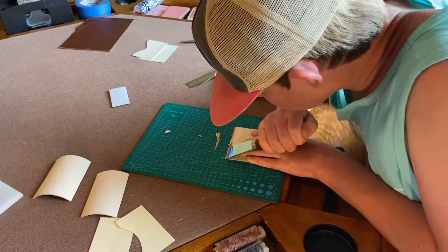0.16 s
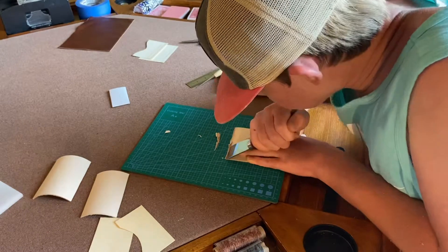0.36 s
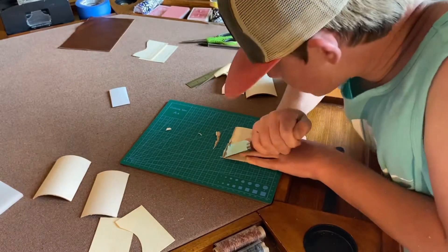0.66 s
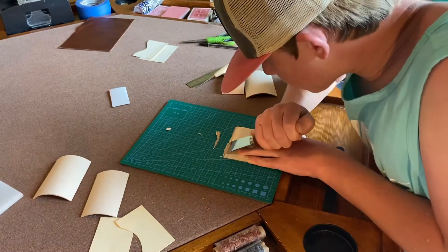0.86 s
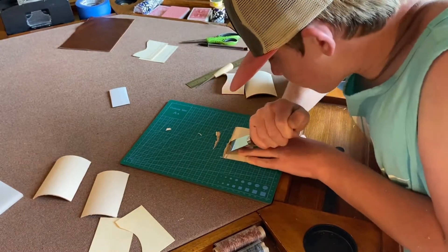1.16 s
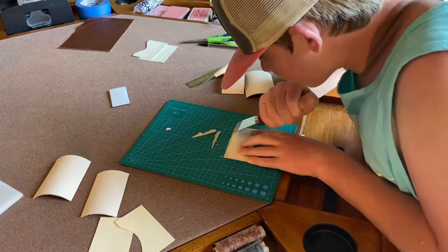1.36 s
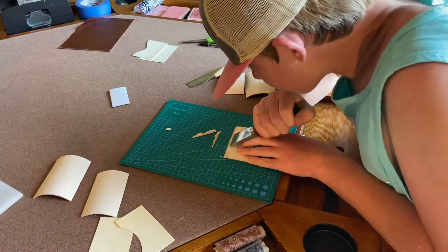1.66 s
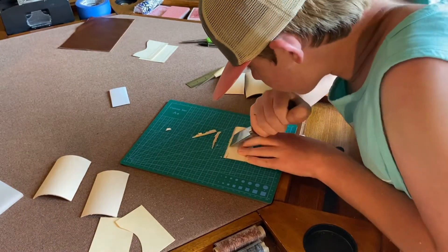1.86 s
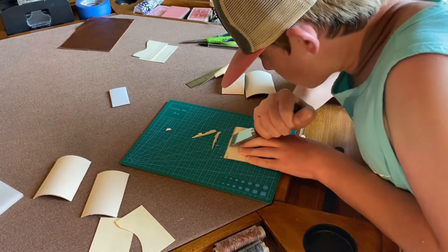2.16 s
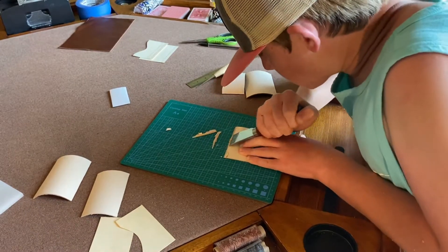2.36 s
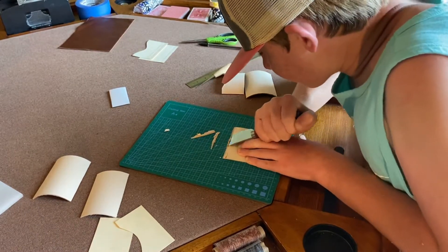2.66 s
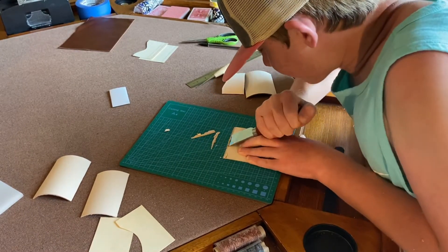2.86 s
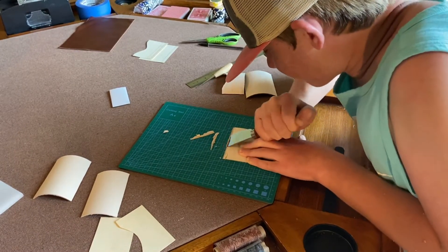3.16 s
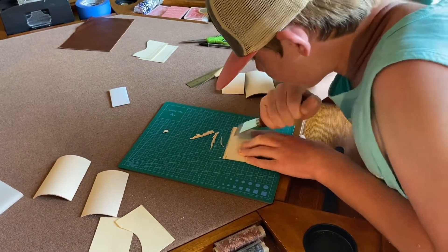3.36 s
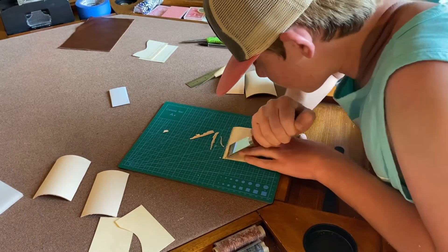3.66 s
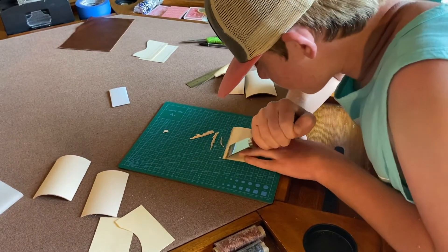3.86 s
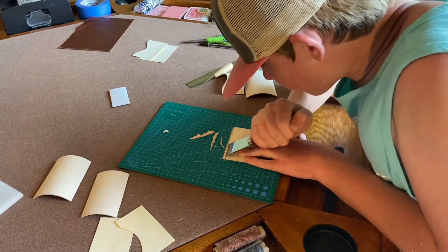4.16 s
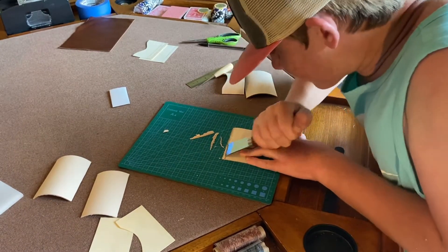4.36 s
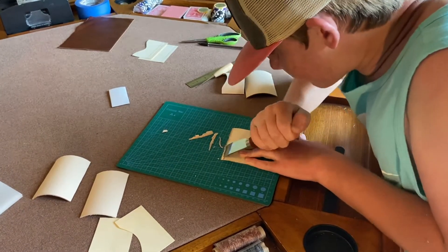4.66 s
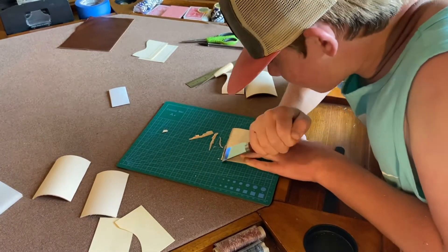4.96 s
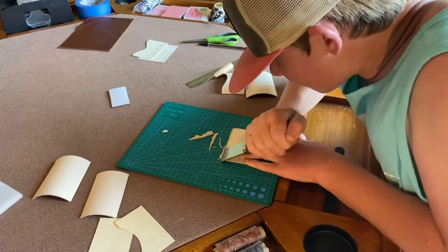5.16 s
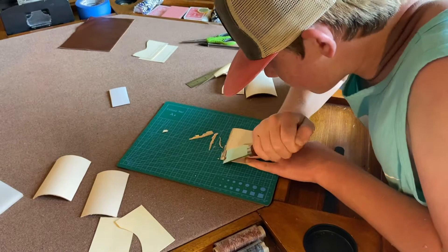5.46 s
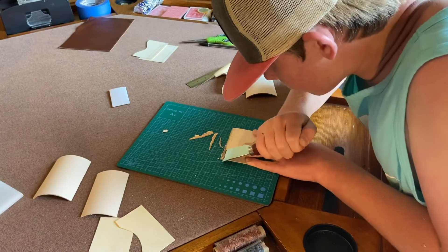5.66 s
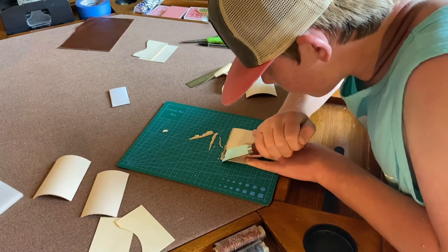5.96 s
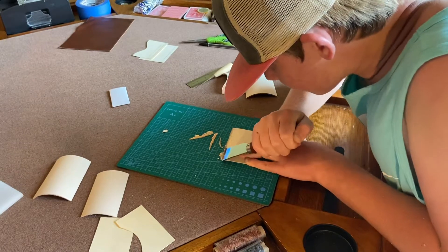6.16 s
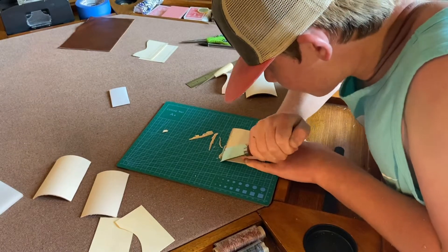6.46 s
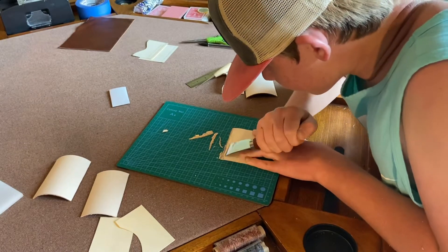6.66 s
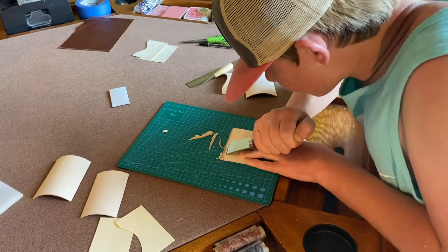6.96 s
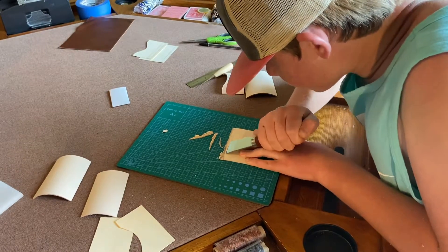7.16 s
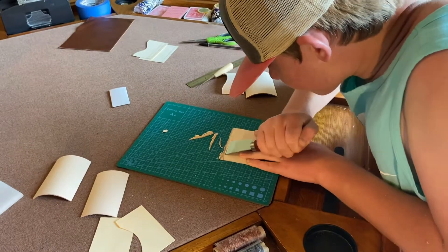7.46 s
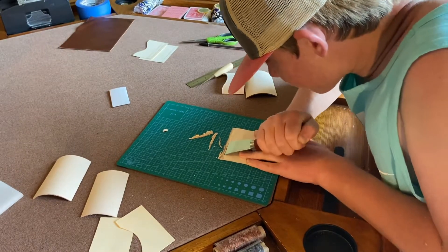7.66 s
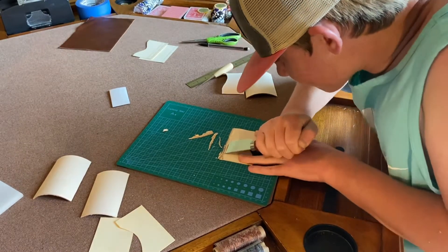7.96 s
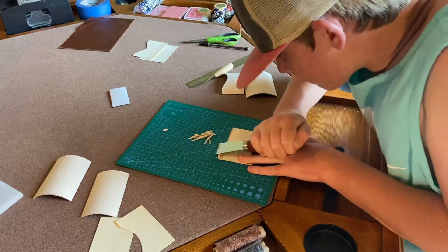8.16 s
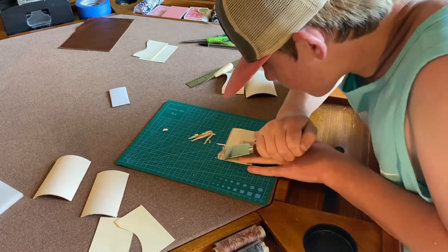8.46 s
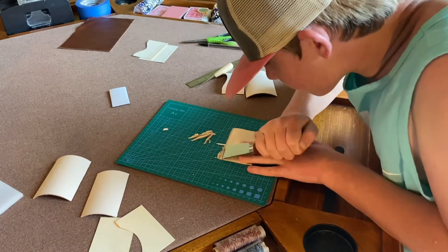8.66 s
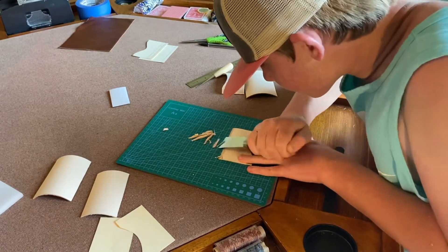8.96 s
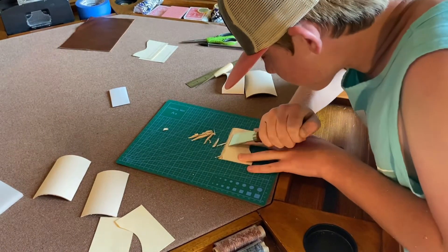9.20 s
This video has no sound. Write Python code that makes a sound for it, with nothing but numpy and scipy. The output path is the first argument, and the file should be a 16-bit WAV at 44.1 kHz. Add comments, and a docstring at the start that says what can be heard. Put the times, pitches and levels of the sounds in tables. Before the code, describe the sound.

A hand blade scrapes and squeaks through leather in short pushes, with a few knocks and one sharp snap, over a steady fan hum.

```python
"""A hand blade pares thin strips off the edge of a piece of leather on a cutting mat.
It is set down with a scuff and a knock that rings the bench, then pushed: it sticks and slips about
sixteen times a second, tearing fibres and squeaking. Once it breaks through and snaps down hard on its
steel edge. Fingers brush the grain, single fibres tick, and a fan hums under it all in the small room."""
import sys
import numpy as np
from scipy import signal
from scipy.fft import rfft, irfft, next_fast_len
from scipy.io import wavfile
from scipy.ndimage import uniform_filter1d

SR = 44100
rng = np.random.default_rng(int(sys.argv[2]) if len(sys.argv) > 2 else 0)


def wav_record(signal):
    """Record a signal, one row per channel, as 16-bit PCM in the file named by sys.argv[1]."""
    frames = np.transpose(np.atleast_2d(signal))
    bounded = np.clip(frames, -1, 1)
    # unit amplitude maps onto the largest positive 16-bit level
    quanta = np.round(bounded * 32767).astype(np.int16)
    wavfile.write(sys.argv[1], SR, quanta)


N = 411453
TIME = np.arange(N) / SR
SIZE = next_fast_len(N + SR // 2, True)
FREQS = np.arange(SIZE // 2 + 1) * SR / SIZE

# Rush of the fan. Each row: frequency in Hz, level in dB. All table levels are relative, before the mix.
AIR_COLOUR = [(20, -40), (40, -38.5), (70, -24), (110, -13), (160, -3.5), (280, -8), (400, -2.5), (620, -9),
              (800, -12), (1600, -17.5), (2600, -20), (4000, -30), (8000, -34), (10500, -41),
              (12500, -44.5), (15500, -47)]
# Droning resonances of the fan. Each row: frequency in Hz, width in Hz, level in dB.
FAN_DRONES = [(55, 5.6, -22.5), (95, 16, -8), (160.4, 44, -3), (172, 13, -0.5), (215.4, 34.5, 2),
              (351, 28, 1), (449, 41, 1), (612, 130, -6.5), (1150, 250, -18.5)]
# Stereo image of the fan. Each row: frequency in Hz, likeness of the channels from 0 to 1.
FAN_LIKENESS = [(40, 0.44), (120, 1), (300, 0.8), (700, 0.93), (1500, 0), (3000, 0), (8000, 0.1),
                (15000, 0.7)]
# Pan of the fan. Each row: frequency in Hz, left minus right in dB.
FAN_PAN = [(60, 10), (120, -1.5), (240, 2), (480, 7), (950, 1), (1890, 5), (3770, 2), (7520, 2.5),
           (15000, 7.5)]
# The edge skids as it is placed. Each row: start in seconds, level in dB, length in seconds,
# hiss offset in dB.
EDGE_SKIDS = [(0.565, -43, 0.0034, -23), (1.143, -44.5, 0.02, -11.5), (1.922, -55.5, 0.01, -32),
              (6.33, -57.5, 0.01, -19), (6.97, -60, 0.0079, -26), (7.043, -59.5, 0.0097, -31),
              (7.906, -65, 0.007, -31), (7.965, -62, 0.008, -30), (8.022, -63, 0.011, -30),
              (8.064, -47, 0.02, -15), (8.858, -50, 0.02, -12)]
# The edge touches again and rings. Each row: start in seconds, level in dB, length in seconds,
# hiss offset in dB, ring pitch in Hz, ring offset in dB.
RINGING_TOUCHES = [(1.197, -60, 0.0078, -17, 2140, 4), (8.103, -52, 0.013, -16, 2160, -2.5),
                   (8.897, -53, 0.011, -13, 3390, -9)]
# Tone of a skid. Each row: frequency in Hz, level in dB.
SKID_COLOUR = [(150, -9), (700, 18.5), (1600, 8.5), (2400, 9.5), (4200, 2.5), (5500, -1), (8300, -1.5),
               (11000, -13)]
# Blade and hand bump the bench. Each row: start in seconds, knock in dB, thump in dB, favoured frequency
# in Hz, its boost in dB, settling offset in dB, settling delay in seconds, pitch ratio of the modes.
BUMPS = [(0.5662, -27, -31, 326, 9, -6, 0.01, 0.99), (1.1513, -35, -40, 1100, 7, -1, 0.0057, 0.96),
         (1.1594, -31.5, -31, 713, 9, -4.5, 0.011, 1.02), (3.065, -40, -49, 450, 7, -4, 0.011, 1.0),
         (3.144, -35.5, -33.5, 160, -2, -2.5, 0.014, 1.01), (3.182, -48, -38.5, 139, 10, -9, 0.0091, 1.0),
         (3.241, -35, -41.5, 140, 8, 1.5, 0.01, 1.02), (5.112, -38.5, -39.5, 1220, 6, -24, 0.0072, 0.98),
         (6.345, -52, -41, 1125, 7, -21, 0.01, 1.06), (8.071, -42.5, -49, 890, 13, -10, 0.01, 1.02),
         (8.8648, -32.5, -41, 613, 6, 1.5, 0.01, 0.99)]
# Bench top under the mat. Each row: base frequency in Hz, level in dB, seconds to fall by 60 dB.
BENCH_MODES = [(118, -12, 0.11), (159, -8, 0.21), (191.5, -8, 0.14), (290, -8, 0.12), (384, -3, 0.099),
               (454.3, 4, 0.097), (540, -2.5, 0.05), (640, 1.5, 0.061), (894, -9, 0.073), (1107, -1, 0.048),
               (1356, -1, 0.02), (1550, -3.5, 0.016), (2260, 1, 0.012), (2787, -4.5, 0.026),
               (3376, -30.5, 0.03), (5370, -15.5, 0.018)]
# Fingers brush the leather. Each row: start in seconds, level in dB, length in seconds.
FINGER_STROKES = [(0.6, -73, 0.094), (3.4, -80, 0.82), (4.42, -67, 0.11), (4.7, -76, 0.59), (5.55, -79, 1),
                  (6.01, -77, 0.046), (6.6, -91, 0.5), (7.12, -81, 0.041), (8.31, -71, 0.025)]
# Short ticks, mostly single fibres parting; a few are other light touches, such as the edge scuffing at 1.017
# s. Each row: start in seconds, pop in dB, click in dB, click centre in Hz.
FIBRE_BREAKS = [(1.017, -50.5, -59, 5500), (2.396, -51, -66, 10000), (2.471, -58, -63, 10000),
                (2.541, -47, -64, 10500), (2.6, -44.5, -60, 10500), (2.660, -47, -61, 10000),
                (2.72, -47, -70, 10500), (3.038, -49, -59, 4540), (3.098, -48, -69, 10000),
                (3.209, -46, -58, 9120), (4.34, -50, -62, 9900), (4.414, -61, -62, 9500),
                (4.465, -45, -56, 8950), (4.544, -52, -55, 8900), (4.596, -47, -70, 9000),
                (4.658, -54, -55, 9000), (4.689, -46.5, -57, 5000), (4.906, -60, -56.5, 6900),
                (5.047, -54, -55, 5900), (5.111, -57, -58, 7000), (7.476, -58, -49.5, 7500),
                (8.074, -55, -47, 9500)]
# Pushes through the leather. Each row: first slip, last slip and hardest moment in seconds, peak effort
# in dB, swell in dB per second, drag offset in dB, squeak offset in dB.
BLADE_PUSHES = [(2.164, 2.446, 2.33, -46.5, 70, -8, 0.5), (2.5, 2.746, 2.68, -43.5, 48, -5, -1),
                (2.994, 3.176, 3.135, -36, 93, -6.5, -7), (4.162, 4.62, 4.58, -43, 24.5, -0.5, -2),
                (5.181, 5.303, 5.23, -49.5, 10, -5, -18)]
# Light slides between pushes. Each row: start in seconds, level in dB, length in seconds.
LIGHT_SLIDES = [(3.93, -72, 0.11), (5.33, -66, 0.12), (6.28, -65.5, 0.21), (7.85, -70, 0.28)]
# Tone of tearing fibres. Each row: frequency in Hz, level in dB.
TEAR_COLOUR = [(150, -31), (600, 0), (1100, 9), (2000, 4.5), (3100, 4), (4400, -7), (6000, -9.5),
               (7500, -10), (10000, -21.5), (12000, -19)]
# Tone of the edge rubbing along the cut. Each row: frequency in Hz, level in dB.
RUB_COLOUR = [(150, -31.5), (600, 7.5), (1100, 10.5), (2400, 0), (4200, -7.5), (7500, -12), (11000, -18)]
# Squeak of the thin edge. Each row: frequency in Hz, width in Hz, level in dB.
SQUEAK_BANDS = [(2900, 600, -9), (4200, 700, -7.5), (5650, 650, -6), (14330, 480, -12.5)]
# The blade breaks through, strikes and bounces. Each row: start in seconds, level in dB, click offset
# in dB, grind offset in dB, favoured frequency in Hz, its boost in dB.
STEEL_STRIKES = [(3.2399, -14.5, 18.5, -15, 5500, 1), (3.272, -21, 7, -12.5, 1393, 2.5),
                 (3.2773, -26, 0, -13, 5500, -1), (3.3163, -31.5, 4, -17, 3000, 5)]
# Steel blade damped by the fist. Each row: frequency in Hz, width in Hz, level in dB.
BLADE_MODES = [(1177, 19, 10), (1235, 700, 3), (1680, 145, 10.5), (2434, 150, 6.5), (2680, 75, 7.5),
               (2980, 330, 5.5), (3676, 90, 10), (3850, 350, 4), (5500, 570, 3.5), (5900, 55, 9.5),
               (6530, 600, -2), (7800, 830, -1), (9260, 3000, -18)]
# High ring of the very edge. Each row: frequency in Hz, width in Hz, level in dB.
EDGE_MODES = [(14300, 350, -18), (15450, 400, -14)]
# Stereo image of the reverb. Each row: frequency in Hz, likeness of the channels from 0 to 1.
REVERB_LIKENESS = [(150, 0.35), (700, 0.73), (1500, 0.4), (3000, 0.032), (8000, 0.033), (15000, 0.092)]
# Pan of the work on the bench. Each row: frequency in Hz, left minus right in dB.
WORK_PAN = [(200, 2), (450, 3), (900, 2.5), (1400, 6.5), (1800, 4.5), (2600, 4), (4000, 2.5), (9500, 2),
            (13500, 7)]


def from_db(db):
    """Decibels to gain."""
    return 10 ** (np.asarray(db) / 20)


def rms_one(x):
    """Scale to unit power."""
    return x / np.sqrt(np.mean(np.abs(x) ** 2) + 1e-20)


def over_hz(points):
    """Join (Hz, value) points on a log-frequency axis."""
    hz, value = np.transpose(points)
    return np.interp(np.log(FREQS + 1), np.log(hz), value)


def filtered(x, response):
    """Pass a signal through a frequency response."""
    return irfft(rfft(x, SIZE) * response, SIZE)[..., :N]


def colour(points):
    """Minimum-phase EQ curve through the points, at unit power gain."""
    cepstrum = irfft(np.log(from_db(over_hz(points))), SIZE)
    log_response = rfft(2 * cepstrum[1:SIZE // 2], SIZE) * np.exp(-2j * np.pi * FREQS / SR)
    return rms_one(np.exp(log_response))


def resonance(hz, width):
    """Response of one damped resonance, gain 1 at its peak."""
    return 1j * FREQS * width / (hz ** 2 - FREQS ** 2 + 1j * FREQS * width)


def band(hz, width):
    """Two like resonances in series, at unit power gain."""
    return rms_one(resonance(hz, width) ** 2)


def pan(points):
    """Left and right gains at each frequency."""
    return from_db(over_hz(points) * np.array([[.5], [-.5]]))


def favoured(hz, spot_hz, spot_db, octaves):
    """Extra dB for the modes that answer most at one spot of contact."""
    return spot_db * np.exp(-(np.log2(hz / spot_hz) / octaves) ** 2)


def stereo_noise(likeness):
    """White noise in two channels, as alike as the table says."""
    alike = np.clip(over_hz(likeness), 0, 1)
    mid, side = filtered(rng.standard_normal((2, N)), np.sqrt([1 + alike, 1 - alike]))
    return np.array([mid + side, mid - side]) / np.sqrt(2)


def grains(per_s, spread_db):
    """Tiny fractures at random moments, a few much larger than the rest."""
    sizes = from_db(spread_db * np.minimum(rng.exponential(1, N), 4)) * rng.choice([-1, 1], N)
    return rms_one(sizes * (rng.random(N) < per_s / SR))


def bursts(rows, texture, rise):
    """The texture swells and dies at each (start, dB, length); rise is the attack as a share of length."""
    out = np.zeros(N)
    for start, db, length in rows:
        span = slice(int(start * SR), min(N, int((start + 3 * length) * SR)))
        age = (TIME[span] - TIME[span.start]) / length
        burst = texture[span] * (1 - np.exp(-age / rise)) * np.exp(-age ** 2)
        out[span] += from_db(db) * rms_one(burst) * np.sqrt(3)
    return out


def fan(fan_db=-48.0):
    """A steady bed of rushing air with a few droning resonances."""
    drone_power = sum(np.abs(from_db(db) * resonance(hz, width) ** 2) ** 2 for hz, width, db in FAN_DRONES)
    tone = rms_one(np.sqrt(from_db(over_hz(AIR_COLOUR)) ** 2 + drone_power))
    return from_db(fan_db) * filtered(stereo_noise(FAN_LIKENESS), tone * pan(FAN_PAN))


def scuffs(scuff_db=-3.5):
    """Gritty skids of the edge with a hiss on top; on a rebound the loosely held blade rings."""
    grit = grains(per_s=7300, spread_db=3.5)
    touches = [row[:4] for row in EDGE_SKIDS + RINGING_TOUCHES]
    skids = bursts([row[:3] for row in touches], grit, rise=0.93)
    hiss_rows = [(start, db + hiss, length) for start, db, length, hiss in touches]
    hisses = filtered(bursts(hiss_rows, rng.standard_normal(N), rise=0.63), band(hz=12000, width=7000))
    rings = sum(bursts([(start, db + ring, length)], np.sin(2 * np.pi * hz * TIME), rise=0.55)
                for start, db, length, _, hz, ring in RINGING_TOUCHES)
    return from_db(scuff_db) * (filtered(skids, colour(SKID_COLOUR)) + rings + hisses)


def blows(soften_db=-15, low_hz=202, low_boost_db=7):
    """Each bump is a blow, then the duller settling of the hand, whose weight favours the low modes."""
    for start, knock, thump, spot_hz, spot_db, settle, delay, pitch in BUMPS:
        yield start, knock, thump, spot_hz, spot_db, pitch
        yield start + delay, knock + settle + soften_db, thump + settle, low_hz, low_boost_db, pitch


def bench_knocks(thump_db=-1.0, attack_s=0.00083):
    """The hand thumps the low bench modes, the harder blade knocks the high ones; the mat softens both."""
    hz, mode_db, t60 = np.transpose(BENCH_MODES)[:, :, None]
    hardness = np.clip(np.log2(hz / 430) * 2, 0, 1)
    age, out = TIME[:SR // 4], np.zeros(N)
    attack = 1 - np.exp(-age / attack_s)
    for start, knock, thump, spot_hz, spot_db, pitch in blows():
        drive_db = hardness * knock + (1 - hardness) * (thump + thump_db)
        drive_db += favoured(hz, spot_hz, spot_db, octaves=0.24)
        decay = from_db(drive_db + mode_db - 60 * age / t60)
        modes = decay * np.sin(2 * np.pi * (pitch * hz * age + rng.random(hz.shape)))
        out[int(start * SR):int(start * SR) + len(age)] += modes.sum(axis=0) * attack
    # the knocks carry almost no deep bass
    return signal.sosfilt(signal.butter(2, 130, "high", fs=SR, output="sos"), out)


def finger_brushes(brush_db=-8.5):
    """Skin slides over the grain: very fine, bright friction."""
    friction = bursts(FINGER_STROKES, grains(per_s=6600, spread_db=6.5), rise=0.34)
    return from_db(brush_db) * filtered(friction, band(hz=11000, width=9000))


def fibre_ticks(pop_hz=1850, pop_octaves=0.41, click_octaves=0.33, fall_db=35, fall_s=0.0031):
    """Each tick, mostly a stretched fibre parting, sounds as a dull pop and a thin click."""
    age, out = TIME[:SR // 50], np.zeros(N)
    for start, pop, click, click_hz in FIBRE_BREAKS:
        crack = rng.standard_normal(len(age)) * from_db(-fall_db * age / fall_s)
        for db, hz, octaves in [(pop, pop_hz, pop_octaves), (click, click_hz, click_octaves)]:
            edges = [hz / 2 ** octaves, min(hz * 2 ** octaves, SR / 2 - 1)]
            tick = signal.sosfilt(signal.butter(2, edges, "band", fs=SR, output="sos"), crack)
            gain = from_db(db) * np.sqrt(fall_s / age[-1])
            out[int(start * SR):int(start * SR) + len(age)] += gain * rms_one(tick)
    return out


def effort_db(t, hardest_s, peak_db, swell, release_db_per_s=56):
    """A push swells steadily to its hardest moment, then the hand eases off."""
    return peak_db - np.maximum(swell * (hardest_s - t), release_db_per_s * (t - hardest_s))


def edge_drag(drag_db=-5.5, overhang_s=0.62):
    """The edge rubs with a thin crackle that follows the effort and fades on either side of a push."""
    crackle = grains(per_s=4500, spread_db=3.5)
    pressure = np.zeros(N)
    for first, last, hardest_s, peak_db, swell, drag, _ in BLADE_PUSHES:
        touch = np.clip(1 + np.minimum(TIME - first, last - TIME) / overhang_s, 0, 1)
        pressure += touch * from_db(effort_db(TIME, hardest_s, peak_db, swell) + drag)
    rubbing = pressure * crackle + bursts(LIGHT_SLIDES, crackle, rise=0.37)
    return from_db(drag_db) * filtered(rubbing, colour(RUB_COLOUR))


def stick_slip(slips_per_s=15.7, quickening=0.1, squeak_growth=0.45):
    """The blade slips at a quickening pace, squeakier with effort: yields (start, tear dB, squeak dB)."""
    for first, last, hardest_s, peak_db, swell, _, squeak in BLADE_PUSHES:
        along = np.linspace(0, 1, round((last - first) * slips_per_s) + 1)
        starts = first + (last - first) * along * (1 + quickening * (1 - along))
        for start, db in zip(starts, effort_db(starts, hardest_s, peak_db, swell)):
            yield start, db, db + squeak + squeak_growth * (db - peak_db)


def paring(slip_db=-12.5, crack_db=-6.5, crack_s=0.003, tear_s=0.017, squeak_s=0.0094):
    """At every slip, fibres let go with a crack and tear in a clump, and the thin edge chirps."""
    slips = list(stick_slip())
    cracks = [(start, db + crack_db, crack_s) for start, db, _ in slips]
    tears = [(start, db, tear_s) for start, db, _ in slips]
    chirps = [(start, db, squeak_s) for start, _, db in slips]
    tearing = bursts(cracks + tears, grains(per_s=2800, spread_db=3.7), rise=0.085)
    jerks = bursts(chirps, rng.standard_normal(N), rise=0.12)
    squeak_tone = sum(from_db(db) * band(hz, width) for hz, width, db in SQUEAK_BANDS)
    return from_db(slip_db) * (filtered(tearing, colour(TEAR_COLOUR)) + filtered(jerks, squeak_tone))


def blade_snaps(snap_db=1.0, crunch=0.29, contact_s=0.0015, grind_s=0.02, break_db=-39, lead_s=0.0068):
    """Each hard contact, a click with crunch and a short grind, rings the damped steel in its own way."""
    grit = grains(per_s=7000, spread_db=2.5)
    modes = [(hz, (-1) ** k * from_db(db) * resonance(hz, width))
             for k, (hz, width, db) in enumerate(BLADE_MODES + EDGE_MODES)]
    out = np.zeros(N)
    for k, (start, db, click, grind, spot_hz, spot_db) in enumerate(STEEL_STRIKES):
        # the last of the leather gives way just ahead of the first strike
        breaking = [(start - lead_s, break_db, 2 * lead_s)] if k == 0 else []
        contact = [(start, db, contact_s), (start, db + grind, grind_s)]
        force = crunch * bursts(breaking + contact, grit, rise=0.045)
        force[int(start * SR)] += from_db(db + click)
        steel = sum(from_db(favoured(hz, spot_hz, spot_db, octaves=0.48)) * mode for hz, mode in modes)
        out += filtered(force, rms_one(steel))
    return from_db(snap_db) * out


def room(x, near_db, near_t60, far_db, far_t60):
    """Direct sound, a quick scatter from bench and body, then the tail of the walls."""
    direct = np.zeros((2, N))
    direct[:, 0] = 1
    tail_power = 0
    for db, t60, delay_s in [(near_db, near_t60, .0005), (far_db, far_t60, .007)]:
        decay = from_db(-60 * np.minimum(TIME / t60, 4)) * (TIME > delay_s)
        tail_power += from_db(db) ** 2 * decay ** 2 / np.sum(decay ** 2)
    response = rfft(direct + np.sqrt(tail_power) * stereo_noise(REVERB_LIKENESS), SIZE)
    # the reflections ripple the spectrum finely but leave its broad colour alone
    power = np.abs(response.mean(axis=0)) ** 2 + np.mean(np.abs(response) ** 2, axis=0)
    broad = uniform_filter1d(power, size=400 * SIZE // SR)
    return filtered(x, response / np.sqrt(broad / 2))


def scene():
    """The work sits a little to the left; the fan fills the room."""
    leather = scuffs() + finger_brushes() + fibre_ticks() + edge_drag() + paring()
    cutting = room(leather, near_db=0.0, near_t60=.022, far_db=-9.0, far_t60=.22)
    bench = room(bench_knocks(), near_db=-11.0, near_t60=.05, far_db=-13.0, far_t60=.3)
    steel = room(blade_snaps(), near_db=-2.0, near_t60=.046, far_db=-12.5, far_t60=.19)
    return filtered(cutting + bench + steel, pan(WORK_PAN)) + fan()


def record(dry, cutoff_hz=15750):
    """A steep low-pass takes off the very top."""
    return signal.sosfilt(signal.ellip(12, .1, 80, cutoff_hz, fs=SR, output="sos"), dry)


dry = scene()
out = record(dry)
wav_record(out)
```